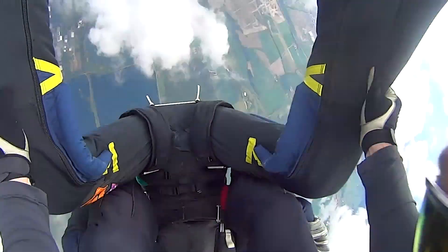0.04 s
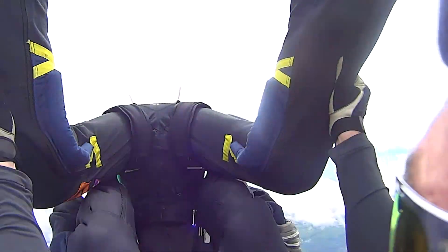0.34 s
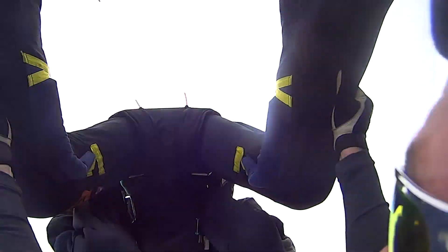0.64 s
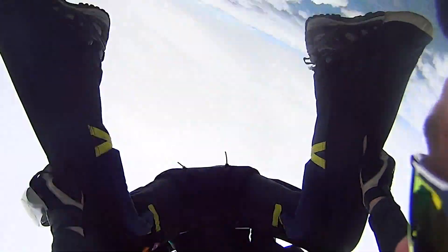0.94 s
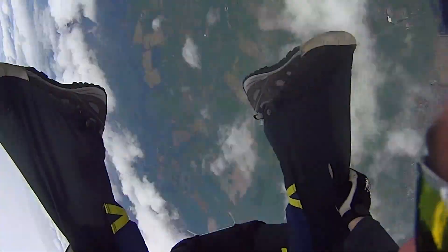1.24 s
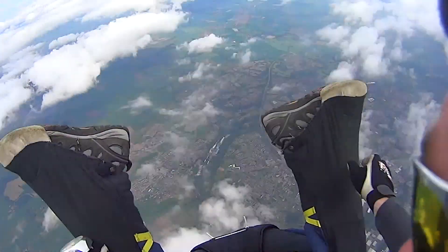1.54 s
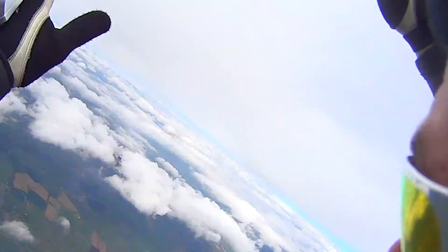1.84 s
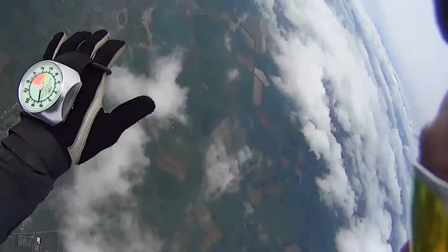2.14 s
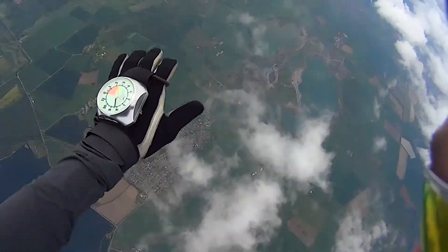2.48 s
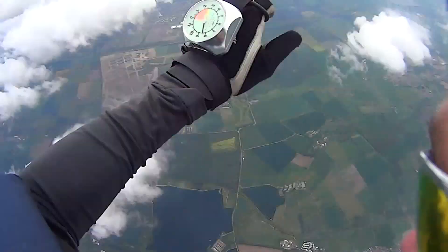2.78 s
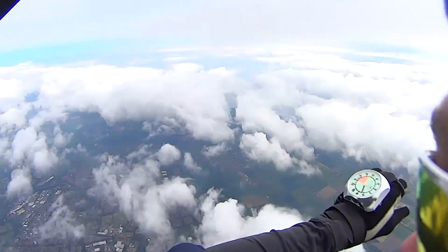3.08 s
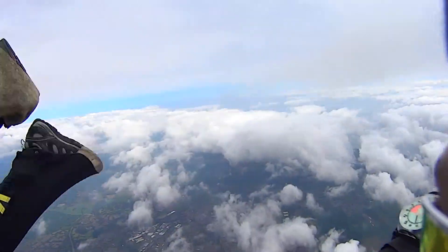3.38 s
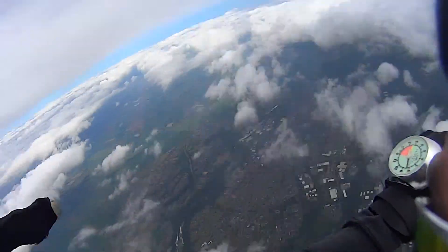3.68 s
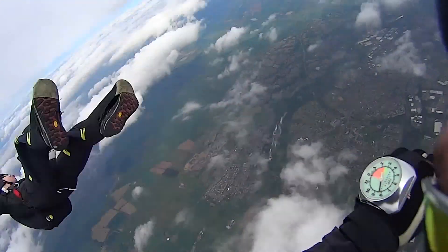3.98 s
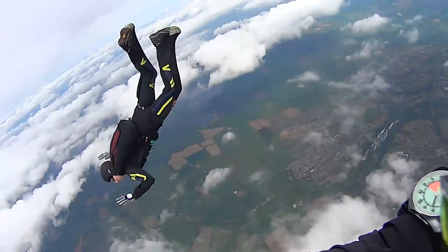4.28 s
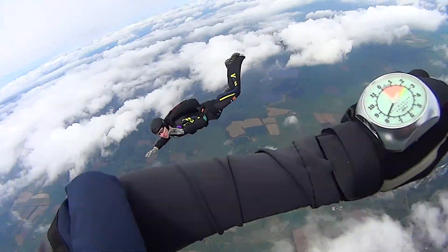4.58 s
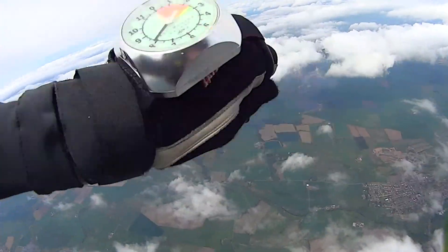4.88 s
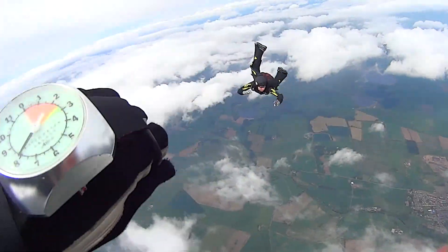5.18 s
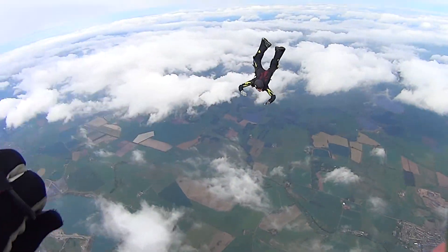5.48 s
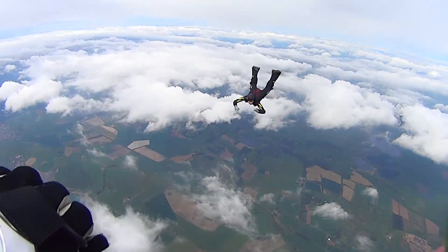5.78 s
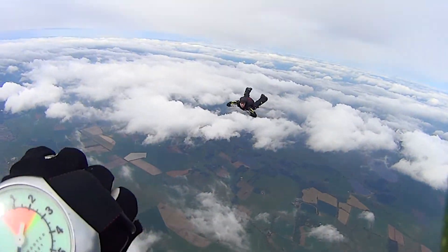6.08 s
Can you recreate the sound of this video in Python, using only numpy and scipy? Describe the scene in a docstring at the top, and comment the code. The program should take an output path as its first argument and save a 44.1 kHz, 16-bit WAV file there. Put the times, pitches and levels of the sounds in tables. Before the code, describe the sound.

Freefall wind blasts straight onto a camera microphone worn by a skydiver high in the open sky. The fluttering rush starts unevenly, thumping and briefly dropping away twice, then runs on at a steady level. Its tone swings between a low, buffeting rumble and a ringing hiss, while throbs and whistling tones swell and fade inside it. Near the end the rumble eases and the hiss takes over.

```python
"""A loud, fluttering rush of wind: freefall, heard by a helmet camera. The air stream rings and hisses in
the cavities of the camera housing, while eddies from the jumpers' bodies roar and thump on its two
microphone ports. As the jumpers tumble, the ports fall deep into the lee twice. Low throbs and ringing
whistles swell and fade in the wind. A fast limiter holds the loudness steady."""
import sys
import numpy as np
from scipy.fft import rfft, irfft, next_fast_len
from scipy.io import wavfile
from scipy.ndimage import uniform_filter1d, map_coordinates

SR = 44100
rng = np.random.default_rng(int(sys.argv[2]) if len(sys.argv) > 2 else 0)


def dump_mix(stems):
    """Bounce the given channels to the path in sys.argv[1] as a 16-bit WAV at rate SR."""
    frames = np.atleast_2d(stems).T  # one column per channel
    limited = np.clip(frames, -1, 1)  # hard clip at full scale
    pcm = np.round(limited * 32767).astype(np.int16)
    wavfile.write(sys.argv[1], SR, pcm)


N = 279153
TIME_S = np.arange(N) / SR


def amp(db):
    """Decibels to gain."""
    return 10 ** (np.asarray(db) / 20)


def read_curves(table, hz):
    """Each column after the frequency, read on a log axis."""
    knots_hz, *columns = np.transpose(table)
    return [np.interp(np.log(hz + 1), np.log(knots_hz), column) for column in columns]


def wobble(rate_hz):
    """A smooth random curve with rate_hz knots a second."""
    knots = rng.standard_normal(int(N * rate_hz / SR) + 4)
    return map_coordinates(knots, [TIME_S * rate_hz], mode="nearest")


def bump(centre_s, length_s):
    """A smooth rise and fall of height 1."""
    return np.exp(-(2 * (TIME_S - centre_s) / length_s) ** 2)


def filtered(x, response):
    """Shape x with a complex response of frequency."""
    size = next_fast_len(N + SR // 8, real=True)
    hz = np.fft.rfftfreq(size, 1 / SR)
    return irfft(rfft(x, size) * response(hz), size)[..., :N]


# How deep the camera sits in the wake: time_s, depth (0 clean air, 1 full wake)
WAKE_PATH = [(0, 0.75), (.35, 0.53), (.5, 1.0), (.62, 0.76), (.75, .18), (1.1, .33), (1.25, 0.76),
             (1.37, 1.0), (1.52, 0.6), (1.8, 0.4), (2.13, 0.46), (2.5, 0.019), (2.87, 0.22), (2.905, 0.91),
             (4.6, 0.78), (4.72, 0.4), (5.2, 0.046), (6.0, 0.29), (6.33, 0.086)]

def wake_depth():
    """The camera drifts in and out of the churned air behind the jumpers."""
    times_s, depths = np.transpose(WAKE_PATH)
    return np.interp(TIME_S, times_s, depths)


# The ports face the wind squarely: centre_s, length_s, lift_db
GUSTS = [(0.066, 0.034, 5), (0.344, 0.04, 6.5), (0.575, 0.026, 0), (0.787, 0.17, 1.5), (1.07, .14, 2),
         (1.32, 0.014, -0.5), (1.404, .025, 9), (1.722, 0.17, 3), (4.403, 0.81, 3)]
# The ports turn out of the wind: start_s, end_s, loss_db, recovery_s
LEES = [(-.1, 0.249, 8, 0.033), (0.106, 0.182, 5, 0.13), (0.37, 0.444, 3, 0.21), (1.453, 1.524, 12, 0.2)]

def exposure(fall_s=0.017):
    """Force of the air on the ports in dB: gusts lift it; in a lee it drops fast and recovers slowly."""
    gust_db = sum(lift_db * bump(centre_s, length_s) for centre_s, length_s, lift_db in GUSTS)
    lee_db = 0
    for start_s, end_s, loss_db, recovery_s in LEES:
        entering = (TIME_S - start_s) / fall_s
        leaving = 1 - (TIME_S - end_s) / recovery_s
        lee_db += loss_db * np.clip(np.minimum(entering, leaving), 0, 1)
    return gust_db - lee_db + 0.35 * wobble(12)


def flow_gain(depth, exposure_db, clean_db, wake_db, follow):
    """A layer's fader: clean_db in clean air, moved by wake_db in full wake and by follow x exposure."""
    return amp(clean_db + wake_db * depth + follow * exposure_db)


# Resonances of the camera housing: pitch_hz, width_hz, lift_db
CAVITIES = [(1080, 480, 6), (1617, 480, 18), (1983, 280, 9.5), (3070, 920, 13), (4404, 830, 5.5),
            (4931, 530, 7.5), (5550, 260, 1.5), (6770, 430, 2.5), (7420, 420, 7.5), (8580, 250, 7.5),
            (9530, 930, 8)]

def housing_db(hz):
    """Each cavity of the housing lifts the band around its resonance."""
    return sum(lift_db / (1 + (2 * (hz - pitch_hz) / width_hz) ** 2)
               for pitch_hz, width_hz, lift_db in CAVITIES)


def turbulence(spectrum, bursts_db, in_housing=False):
    """Two unrelated pressure noises, together of rms 1, that come in the same bursts."""
    def colour(hz):
        return amp(read_curves(spectrum, hz)[0] + (housing_db(hz) if in_housing else 0))
    pair = filtered(rng.standard_normal((2, N)) * amp(bursts_db), colour)
    return pair / np.std(pair)


# Low throbs, roar and ringing whistles: start_s, end_s, pitch_hz, half_width_hz, level_db
WIND_BANDS = [(0.413, 0.652, 287, 55, -21.5), (1.244, 1.471, 200, 75, -19.5),
              (2.024, 2.516, 136, 21.2, -21), (2.3, 2.9, 1490, 90, -28), (1.14, 1.46, 5000, 150, -37.5),
              (2.816, 2.922, 1380, 70, -24), (3.65, 4.804, 613, 130, -22.5), (4.2, 6.402, 360, 123, -26.5),
              (4.65, 6.4, 3124, 90, -27), (4.694, 6.6, 2070, 129, -26), (2.812, 2.885, 4770, 400, -24.5)]

def wind_bands():
    """Narrow bands of wind noise swell and fade."""
    bands = np.zeros((2, N))
    for start_s, end_s, pitch_hz, half_width_hz, level_db in WIND_BANDS:
        noise = rng.standard_normal((2, N))
        band = filtered(noise, lambda hz: 1 / (1 + ((hz - pitch_hz) / half_width_hz) ** 2))
        progress = np.clip((TIME_S - start_s) / (end_s - start_s), 0, 1)
        swell = np.sqrt(np.abs(np.sin(np.pi * progress)))
        bands += amp(level_db) * swell * band / np.std(band)
    return bands


# Large eddies that strike the ports: centre_s, length_s, level_db
THUMPS = [(0.392, 0.046, -15.5), (0.687, 0.1, -29), (1.263, 0.041, -19), (1.642, 0.13, -20),
          (4.685, 0.082, -23)]

def thumps(low_hz, high_hz):
    """An eddy hits the ports with a deep, short push."""
    noise = rng.standard_normal((2, N))
    rumble = filtered(noise, lambda hz: (hz / (hz + low_hz)) ** 2 / (1 + (hz / high_hz) ** 2) ** 2)
    blows = sum(amp(level_db) * bump(centre_s, length_s) for centre_s, length_s, level_db in THUMPS)
    return blows * rumble / np.std(rumble)


# Tone of the deep buffet and the low-mid roar: frequency_hz, relative_db
BUFFET_SPECTRUM = [(12, -29), (25, -29), (48, -6), (80, 4), (140, 7), (200, -4), (400, -70)]
ROAR_SPECTRUM = [(80, -26), (160, -8.5), (250, 1), (310, 2.5), (420, -1.5), (530, -0.5), (680, -9),
                 (850, -12.5), (1700, -24.5), (4000, -70)]

def wake(depth, exposure_db, eddies, parting_s=4.8, parting_length_s=0.4, parting_drop_db=3.5):
    """Large eddies buffet the ports, easing once the jumpers part; smaller ones roar."""
    parted = np.clip((TIME_S - parting_s) / parting_length_s, 0, 1)
    buffet = turbulence(BUFFET_SPECTRUM, 0.6 * wobble(14)) * amp(-parting_drop_db * parted)
    buffet *= flow_gain(depth, exposure_db, clean_db=-35, wake_db=12.6, follow=0.45)
    roar = turbulence(ROAR_SPECTRUM, 0.43 * eddies + 1.63 * wobble(13))
    roar *= flow_gain(depth, exposure_db, clean_db=-24.5, wake_db=8.85, follow=0.97)
    return buffet + roar


# Tone of the midrange rush, the hollow ring and the bright hiss: frequency_hz, relative_db
RUSH_SPECTRUM = [(250, -19.5), (600, 2), (850, -0.5), (1130, 4.5), (1400, -4), (2300, -11.5), (2750, -12.5),
                 (4000, -39), (7000, -52)]
RING_SPECTRUM = [(600, -21), (1100, -11), (1420, 3.5), (1750, -3.5), (2130, 1.5), (2420, -2), (3100, -6),
                 (3700, -16), (7000, -55)]
HISS_SPECTRUM = [(1500, -12), (2500, -5.5), (3200, -2), (3900, -0.5), (5600, -2.5), (6200, -4),
                 (9000, -13.5), (10000, -13.5), (11000, -22)]
# The edge of a wake sweeps past and lifts the hiss: centre_s, length_s, lift_db
SWISHES = [(1.165, 0.032, 5.5), (1.3, .022, 4.5), (1.416, .022, 7), (1.445, 0.014, 7.5), (2.865, .05, 2.5),
           (4.675, .05, 9)]

def air_stream(depth, exposure_db, eddies):
    """Fast air rushes past and sounds the housing; the finest swirls spurt, so the hiss crackles."""
    spurts = wobble(700)
    swish_db = sum(lift_db * bump(centre_s, length_s) for centre_s, length_s, lift_db in SWISHES)
    rush = turbulence(RUSH_SPECTRUM, 1.9 * eddies)
    rush *= flow_gain(depth, exposure_db, clean_db=-23.5, wake_db=-0.8, follow=1.4)
    ring = turbulence(RING_SPECTRUM, 0.76 * eddies + 1.25 * spurts, in_housing=True)
    ring *= flow_gain(depth, exposure_db, clean_db=-14.5, wake_db=-7, follow=0.73)
    hiss = turbulence(HISS_SPECTRUM, 1.3 * eddies + 1.3 * spurts, in_housing=True) * amp(swish_db)
    hiss *= flow_gain(depth, exposure_db, clean_db=-19, wake_db=-13.5, follow=0.79)
    return rush + ring + hiss


# Stereo image of the two ports: frequency_hz, likeness (0 to 1), left_lead_rad, left_minus_right_db
PORT_IMAGE = [(75, 0.96, -0.14, 0.4), (170, 0.82, -0.61, -1.7), (310, 0.75, -1.32, -1.3),
              (450, 0.76, -0.91, 0.4), (800, 0.56, -0.81, 0.4), (1200, 0.6, -0.28, -3.6),
              (1450, 0.95, -0.33, -1.5), (1950, 0.9, 0.02, -0.8), (2200, 0.77, -0.07, 0.9),
              (2450, 0.13, -2.55, 2.0), (3050, 0.42, 0.37, 2.3), (3600, 0.31, 2.75, -0.3),
              (4350, 0.59, 1.67, -0.4), (4950, 0.77, 0.28, -1.8), (5500, 0.08, 0.93, -1.2),
              (9500, 0.22, 3.08, -0.3)]

def at_ports(pair):
    """Two unrelated pressures become the shared and the opposed part of what the two ports hear."""
    def response(hz):
        likeness, lead_rad, balance_db = read_curves(PORT_IMAGE, hz)
        spread_rad = np.arccos(np.clip(likeness, 0, 1)) / 2
        side = np.array([[1], [-1]])  # left, right
        port = amp(side * balance_db / 2) * np.exp(1j * side * lead_rad / 2)
        return np.array([np.cos(spread_rad) * port, side * np.sin(spread_rad) * port])
    return filtered(pair[:, None], response).sum(axis=0)


def scene():
    """The wake trades treble for bass, exposure lifts the wind, and shared eddies make it flutter."""
    depth = wake_depth()
    exposure_db = exposure()
    eddies = wobble(130)
    wind = wake(depth, exposure_db, eddies) + air_stream(depth, exposure_db, eddies)
    return at_ports(wind + wind_bands() + thumps(low_hz=90, high_hz=150))


def limiter(x, ceiling_db, window_samples):
    """One gain for both channels follows the power in a short centred window, with a soft knee."""
    power = uniform_filter1d(np.mean(x ** 2, axis=0), window_samples)
    rms = np.sqrt(np.abs(power))
    return x / (1 + (rms / amp(ceiling_db)) ** 5) ** (1 / 5)


def record(dry):
    """The camera limits the level and keeps nothing above its band limit."""
    band_limit_hz = 10990
    held = limiter(dry, ceiling_db=-12.7, window_samples=240)
    return filtered(held, lambda hz: hz < band_limit_hz)


dry = scene()
out = record(dry)
dump_mix(out)
```